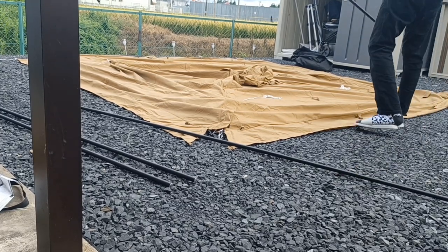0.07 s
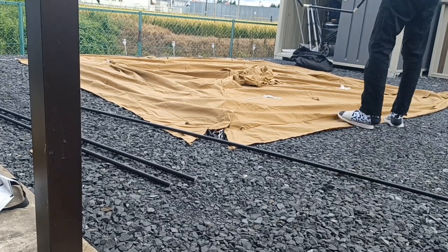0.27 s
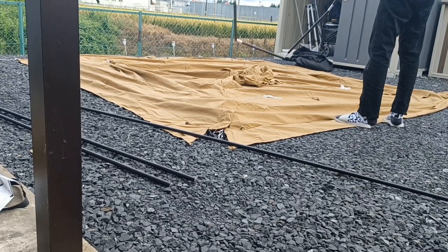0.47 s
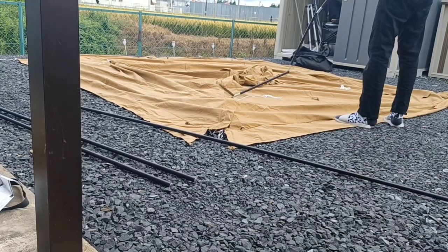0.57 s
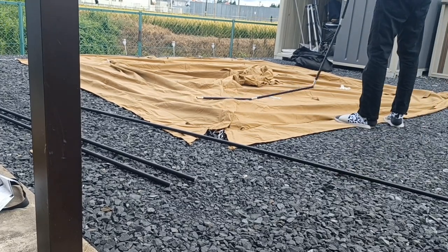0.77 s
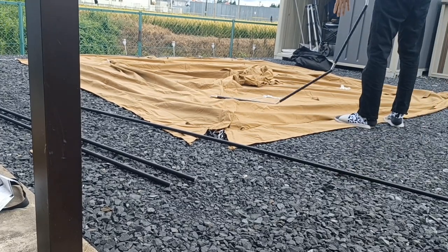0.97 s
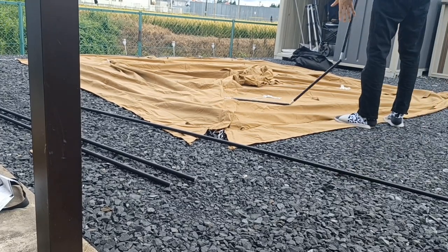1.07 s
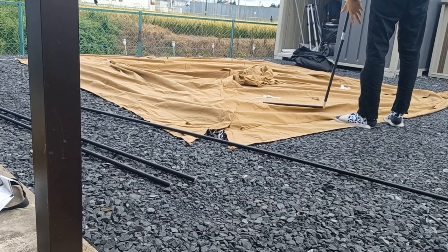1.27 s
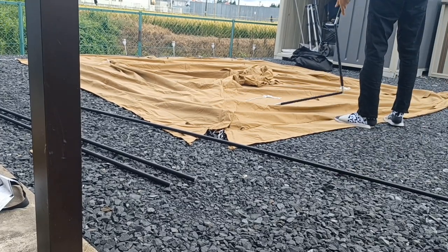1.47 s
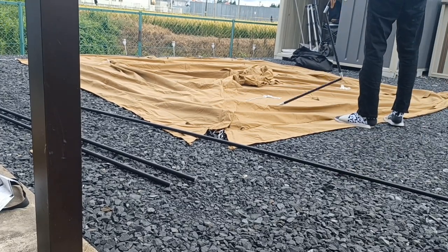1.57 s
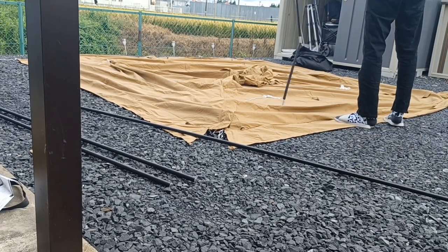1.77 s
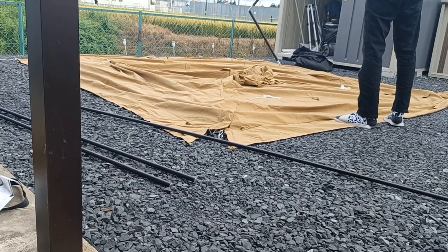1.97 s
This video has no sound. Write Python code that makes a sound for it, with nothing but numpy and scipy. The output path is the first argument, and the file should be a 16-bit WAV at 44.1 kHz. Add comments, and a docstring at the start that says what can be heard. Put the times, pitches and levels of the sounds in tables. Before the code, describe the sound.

Metal tent pole sections clink at about 0.2 and 0.4 seconds, with a few low microphone bumps on the left. Around 0.6 seconds the joints snap home in a loud, bright clatter as one end knocks dully on canvas over gravel. After faint sliding, lighter clinks come near 1.5 and 1.65 seconds. Each has a short echo, over soft outdoor noise and a faint, distant engine hum.

```python
"""Metal tubes clink, slide and snap together as a sectioned tent pole is unfolded.
Each contact rings one section at its own pitches; hard surfaces nearby add a short, dense echo.
One end of the pole knocks on a canvas sheet spread on gravel.
A few low bumps reach the left microphone, and a far engine hums under soft outdoor noise."""
import sys
import numpy as np
from scipy import signal
from scipy.fft import rfft, irfft, next_fast_len
from scipy.io import wavfile

SR = 44100
rng = np.random.default_rng(int(sys.argv[2]) if len(sys.argv) > 2 else 0)


def wav_out(sig):
    """Save sig, one row per channel (or a flat mono array), as 16-bit PCM at SR to the path in sys.argv[1]."""
    wavfile.write(sys.argv[1], SR, np.round(np.clip(np.atleast_2d(sig).T, -1, 1) * 32767).astype(np.int16))


N = 88200
T = np.arange(N) / SR
LEFT_LAG_S = .0001  # the pole is to the right


def clinks():
    """Tube strikes tube: an impulse and its echo ring one section."""
    # Each row: start in seconds, section, level in dB, treble tilt in dB per octave,
    # high-mode gain in dB, low-mode gain in dB.
    strikes = [(.010, "first", -63, -7, 17.5, 13.5), (.031, "first", -52, -6, 6, 10),
               (.192, "first", -29.5, -0.5, -12, -6), (.199, "first", -33.5, 0.5, 7, 10),
               (0.3709, "second", -32, -2.5, -1, -0.5), (0.485, "second", -46.5, -4, -2, -12),
               (.580, "first", -26.5, -1.1, 3.5, 6), (.600, "first", -20, -0.6, 5, 4.5),
               (0.613, "first", -26.5, -2, 10.5, -14), (.622, "first", -21.5, 3, -13, -1.5),
               (0.63, "first", -25, -2, -2, -8.5), (0.854, "second", -56, -6, -9, -20),
               (1.372, "third", -66.5, -4.5, 18, 9), (1.424, "third", -61, -8, 5.5, 5),
               (1.451, "third", -52, -5, 11, 9), (1.470, "third", -28, 0, -2.5, -3.5),
               (1.598, "fourth", -48, -4.5, 3, 9), (1.627, "fourth", -40.5, -3.5, 10.5, 6),
               (1.659, "fourth", -36.5, -0.5, 3, 1), (1.896, "fourth", -67, -1, 13, 11.5),
               (1.953, "fourth", -69.5, -7, 13.5, 11.5)]
    impulse = from_db(9)
    out = np.zeros((2, N))
    for start_s, section, db, tilt_db_oct, high_db, low_db in strikes:
        force = echo()
        force[0, round(LEFT_LAG_S * SR)] += impulse
        force[1, 0] += impulse
        add(out, from_db(db) * tube(force, section, tilt_db_oct, high_db, low_db), start_s)
    return out


def tube(force, section, tilt_db_oct, high_db, low_db):
    """A broad metallic clack plus the section's modes, each a close pair that differs per contact."""
    # Each row: frequency in Hz, contact level in dB.
    contact_spectrum = [(700, -14), (1400, -5.5), (2200, 1), (3500, 3), (4350, -0.5), (5400, 3.5),
                        (5900, -5), (6500, -11.5), (7100, 4), (7700, -5.5), (8300, 3), (9500, 4.5),
                        (15500, -0.5)]
    # Per section, each row: mode frequency in Hz, gain on the clack in dB.
    section_modes = {"first": [(1220, 3), (2150, -1.5), (2300, -1), (2720, -4.5), (3520, 0.5), (5160, 5.5),
                     (7030, 3), (8170, 7), (8320, 9)], "second": [(2750, 1.5), (3560, 6.5), (5260, 3),
                     (5410, 6.5), (7170, 1.5), (8470, 9)], "third": [(2220, 0), (3420, 0), (5150, -4),
                     (8190, 13)], "fourth": [(1215, 1), (2110, 4), (3340, 0), (5080, 6), (7070, 3.5),
                     (8170, 4)]}
    t60_s, high_above_hz, detune_spread, gain_spread_db = .045, 4000, .006, 1.5
    radius = np.exp(-np.log(1000) / (t60_s * SR))
    clack = colour(force, contact_spectrum, tilt_db_oct)
    out = clack.copy()
    for hz, db in section_modes[section]:
        ring_db = high_db if hz > high_above_hz else low_db
        for detune, strength in rng.standard_normal((2, 2)):
            angle = 2 * np.pi * hz * (1 + detune_spread * detune) / SR
            feedback = [1, -2 * radius * np.cos(angle), radius ** 2]
            mode = signal.lfilter([1, 0, -1], feedback, clack) * (1 - radius ** 2) / 2
            out += from_db(db + ring_db + gain_spread_db * strength) * mode / np.sqrt(2)
    return out


def snaps():
    """A ferrule snaps home in its socket: a very short, bright burst with a brief echo."""
    # Each row: start in seconds, level in dB.
    events = [(.3727, -8), (.5805, -13), (.6008, -2)]
    # Each row: frequency in Hz, level in dB.
    spectrum = [(500, -30.5), (3500, 4.5), (7000, -16), (10500, 8), (15500, 4.5)]
    decay_s, left_db, echo_db, echo_fade_s = .0007, -6, -17, .015
    out, t = np.zeros((2, N)), T[:SR // 100]
    for start_s, db in events:
        burst = colour(rng.choice([-1, 1], len(t)) * np.exp(-t / decay_s), spectrum)
        add(out, from_db(db) * burst * [[0], [1]], start_s)
        add(out, from_db(db + left_db) * burst * [[1], [0]], start_s + LEFT_LAG_S)
        reflections = signal.fftconvolve(echo(), burst[None] / np.linalg.norm(burst), axes=1)
        fade = np.exp(-T[:reflections.shape[1]] / echo_fade_s)
        add(out, from_db(db + echo_db) * reflections * fade, start_s)
    return out


def slides():
    """Tubes slide in their joints: a short run of tiny friction catches rings the section."""
    # Each row: start in seconds, section, length in seconds, level in dB,
    # treble tilt in dB per octave, mode gain in dB.
    events = [(0.526, "second", 0.0095, -40.5, -5.5, 2), (0.985, "second", 0.02, -59.5, -2, -3.5),
              (1.259, "third", 0.015, -57.5, -3, 7), (1.877, "third", 0.034, -64.5, 4.5, 8.5)]
    catches_per_s, spread_db = 790, 6.5
    out = np.zeros((2, N))
    for start_s, section, length_s, db, tilt_db_oct, ring_db in events:
        caught = rng.random(N) < catches_per_s / SR
        strength = from_db(spread_db * rng.standard_normal(N)) * rng.choice([-1, 1], N)
        catches = (caught * strength)[:int(length_s * SR)]
        catches /= np.linalg.norm(catches) + 1e-9
        force = signal.fftconvolve(echo(), catches[None], axes=1)
        add(out, from_db(db) * tube(force, section, tilt_db_oct, ring_db, ring_db), start_s)
    return out


def knocks():
    """The pole end lands on the canvas: a hollow thump and a dull rattle of the gravel beneath."""
    # Each row: start in seconds, level in dB, pitch in Hz.
    landings = [(.571, -40, 510), (.583, -35, 290), (.609, -27, 420), (.631, -36, 350)]
    # Each row: frequency in Hz, level in dB.
    gravel_spectrum = [(60, -32), (150, -5), (300, 0), (430, 2), (600, -3), (850, -10), (2000, -42)]
    gravel_t60_s, side_db, thump_db = .2, -11, 15
    out = np.zeros((2, N))
    for start_s, db, hz in landings:
        mid, side = rng.standard_normal((2, N)) * from_db(-60 * T / gravel_t60_s)
        gravel = colour(mid + from_db(side_db) * side * [[1], [-1]], gravel_spectrum)
        add(out, from_db(db) * (gravel + from_db(thump_db) * thump(hz, t60_s=.04)), start_s)
    return out


def bumps():
    """Low bumps on the microphone, mostly on the left."""
    # Each row: start in seconds, level in dB, pitch in Hz, T60 in seconds.
    events = [(0.049, -25.5, 111.6, 0.097), (0.118, -40.5, 91.5, 0.2), (.215, -11.5, 101.6, 0.064),
              (0.286, -25, 70, 0.17), (.313, -20, 118, 0.067), (0.42, -30, 82, 0.1)]
    right_db = -20.5
    out = np.zeros((2, N))
    for start_s, db, hz, t60_s in events:
        add(out, thump(hz, t60_s) * from_db([[db], [db + right_db]]), start_s)
    return out


def thump(hz, t60_s, rise_s=.0046):
    """A few dying cycles with a soft start."""
    attack = 1 - np.exp(-T / rise_s)
    return -np.sin(2 * np.pi * hz * T) * attack * from_db(-60 * T / t60_s)


def echo():
    """Stereo response of nearby surfaces: dense early reflections, a tail whose treble dies first."""
    # Each row: band centre in Hz, T60 in seconds.
    band_decays = [(300, 0.89), (800, 0.39), (2000, 0.34), (5500, .3), (14000, 0.24)]
    early_db, early_decay_s, early_per_s, early_correlation = -2.5, .029, 3000, .41
    tail_db, left_db = .5, -1.66
    t = T[:N // 3]
    hz = np.arange(len(t) // 2 + 1) * SR / len(t)
    white = rfft(rng.standard_normal((2, len(t))))
    centres_hz, t60s_s = np.transpose(band_decays)
    tail = np.zeros((2, len(t)))
    for weights, t60_s in zip(np.eye(len(centres_hz)), t60s_s):
        band = irfft(white * at_hz(np.c_[centres_hz, weights], hz))
        tail += band * from_db(-60 * t / t60_s)
    early = rms_one(rng.standard_normal((2, len(t))) * (rng.random(len(t)) < early_per_s / SR))
    lagged_right = np.roll(early[1], round(LEFT_LAG_S * SR))
    early[0] = np.sqrt(1 - early_correlation ** 2) * early[0] + early_correlation * lagged_right
    early *= np.exp(-t / early_decay_s)
    return (from_db(tail_db) * tail + from_db(early_db) * early) * from_db([[left_db], [0]])


def engine():
    """A far engine hums: multiples of its turning rate, wavering in pitch and level."""
    # Each row: order, RMS level in dB.
    orders = [(4, -66.5), (6, -62.5), (7, -64.5), (8, -69.5), (10, -60)]
    turns_per_s, speed_spread, level_spread = 38.7, .003, .4
    turns = np.cumsum(turns_per_s * (1 + speed_spread * drift(knots_per_s=9.2))) / SR
    hum = np.zeros(N)
    for order, db in orders:
        amplitude = np.sqrt(2) * from_db(db) * (1 + level_spread * drift(knots_per_s=9))
        hum += amplitude * np.sin(2 * np.pi * (order * turns + rng.random()))
    return hum


def outdoor_air():
    """Soft, steady rumble and hiss, weaker on the left."""
    # Each row: frequency in Hz, level in dB.
    spectrum = [(30, -27), (50, -11), (80, -0.5), (190, 0), (280, 0.5), (420, -2), (530, -10.5), (800, -18),
                (1500, -27), (9000, -33), (15500, -35.5)]
    # Each row: frequency in Hz, side minus mid in dB.
    width = [(60, 5), (150, -16), (300, -10), (600, -12), (1200, 0), (10000, 0)]
    left_db, right_db = -58, -54
    mid, side = colour(rng.standard_normal((2, N)), spectrum)
    hz = np.arange(N // 2 + 1) * SR / N
    side = irfft(rfft(side) * from_db(at_hz(width, hz)))
    return from_db([[left_db], [right_db]]) * (mid + side * [[1], [-1]])


def colour(x, spectrum, tilt_db_oct=0):
    """Unit-power minimum-phase filter with the given spectrum, tilted above 1 kHz."""
    n = x.shape[-1]
    size = 2 * next_fast_len(n // 2 + 2048)
    hz = np.arange(size // 2 + 1) * SR / size
    gain = rms_one(from_db(at_hz(spectrum, hz) + tilt_db_oct * np.log2(np.maximum(hz, 1000))))
    cepstrum = irfft(np.log(gain))
    cepstrum[1:size // 2] *= 2  # fold onto positive time: causal
    cepstrum[size // 2 + 1:] = 0
    return irfft(rfft(x, size) * np.exp(rfft(cepstrum)))[..., :n]


def drift(knots_per_s):
    """Straight lines between unit Gaussian knots."""
    knots = rng.standard_normal(200)
    return np.interp(T * knots_per_s, np.arange(len(knots)), knots)


def from_db(db):
    """Decibels to gain."""
    return 10 ** (np.asarray(db) / 20)


def rms_one(x):
    """Scale to RMS 1."""
    return x / np.sqrt(np.mean(x ** 2) + 1e-20)


def at_hz(points, hz):
    """Read a table on a log-frequency axis."""
    points_hz, values = np.transpose(points)
    return np.interp(np.log(np.maximum(hz, 1)), np.log(points_hz), values)


def add(out, x, start_s):
    """Mix x into out from start_s on."""
    i = max(int(start_s * SR), 0)
    out[:, i:i + x.shape[1]] += x[:, :N - i]


def scene():
    """Pole, ground, microphone bumps and background."""
    return clinks() + snaps() + slides() + knocks() + bumps() + engine() + outdoor_air()


def record(dry):
    """Gentle low cut, steep high cut, clip at full scale."""
    low_cut_hz, high_cut_hz = 45, 15900
    highpass = signal.butter(2, low_cut_hz, "high", fs=SR, output="sos")
    lowpass = signal.ellip(12, .1, 70, high_cut_hz, fs=SR, output="sos")
    return np.clip(signal.sosfilt(lowpass, signal.sosfilt(highpass, dry)), -1, 1)


dry = scene()
out = record(dry)
wav_out(out)
```